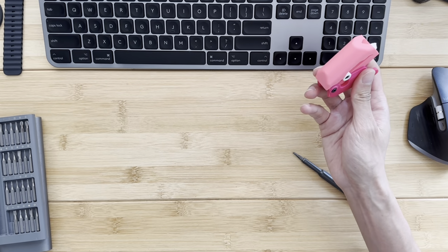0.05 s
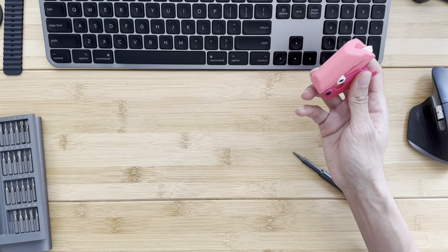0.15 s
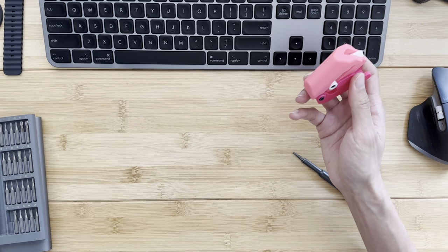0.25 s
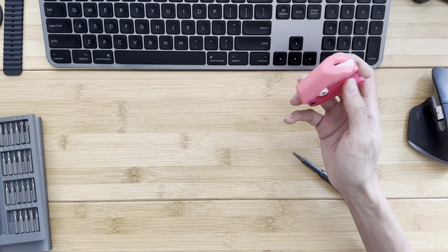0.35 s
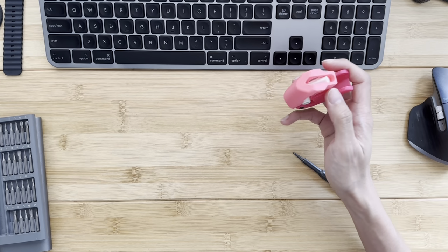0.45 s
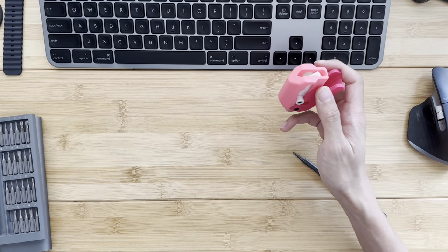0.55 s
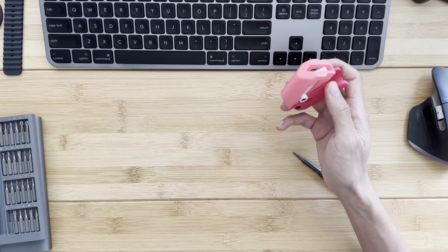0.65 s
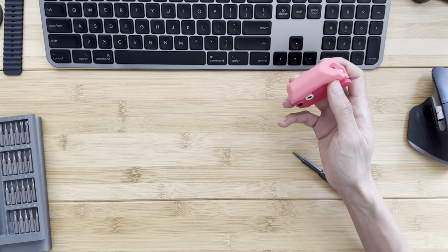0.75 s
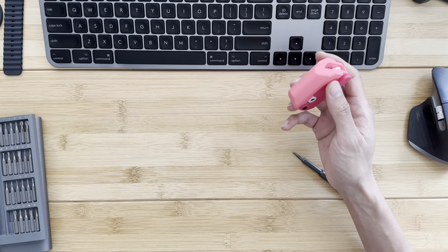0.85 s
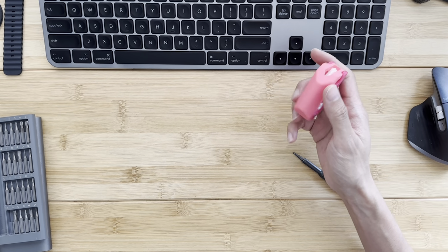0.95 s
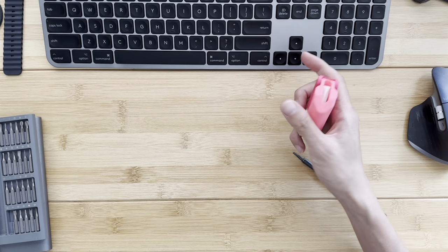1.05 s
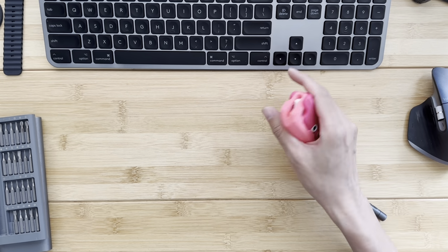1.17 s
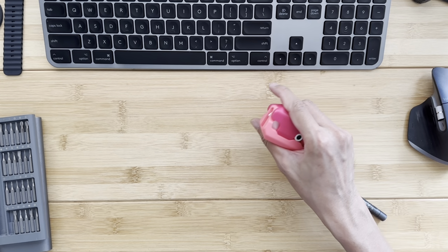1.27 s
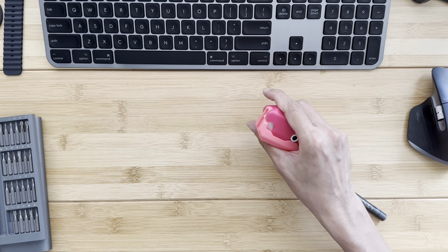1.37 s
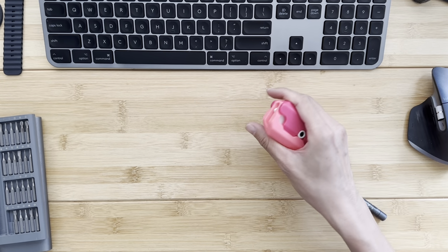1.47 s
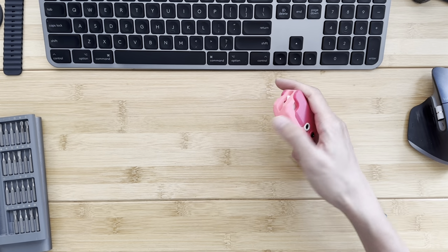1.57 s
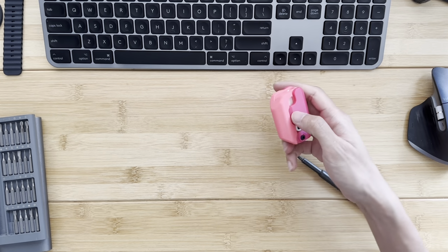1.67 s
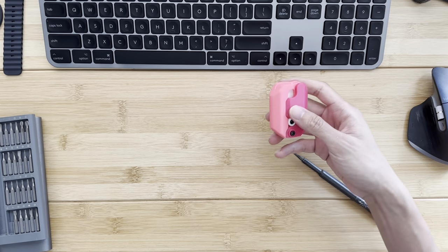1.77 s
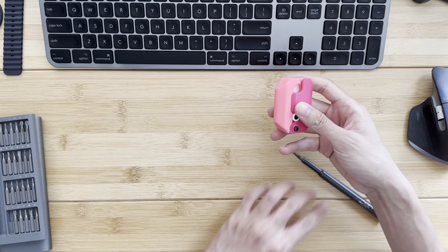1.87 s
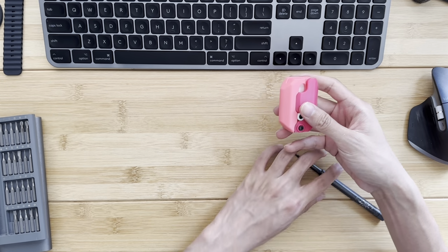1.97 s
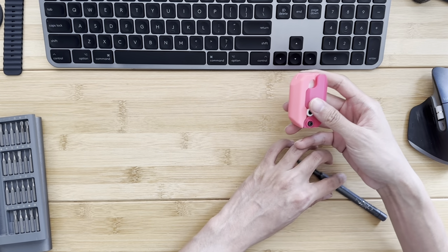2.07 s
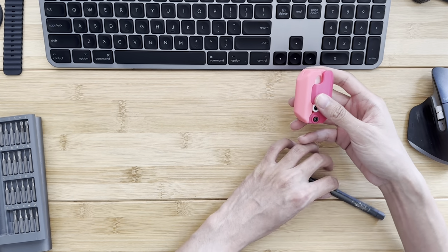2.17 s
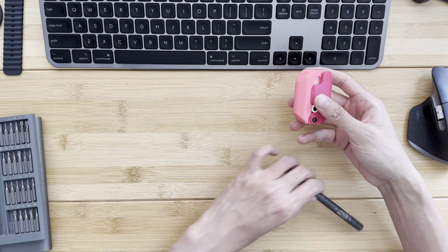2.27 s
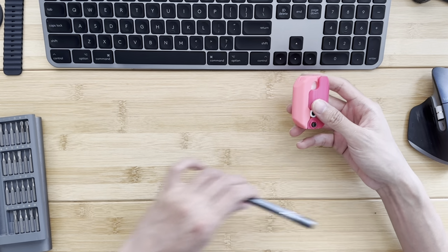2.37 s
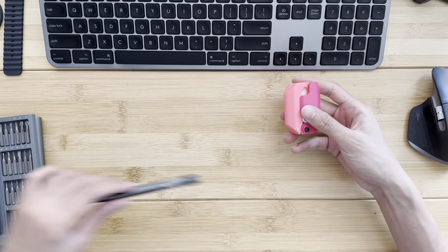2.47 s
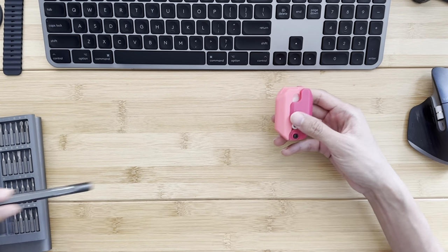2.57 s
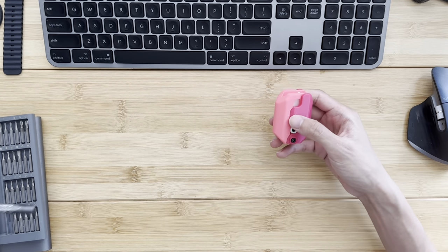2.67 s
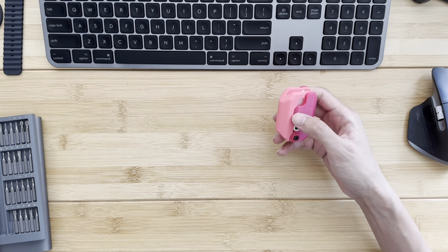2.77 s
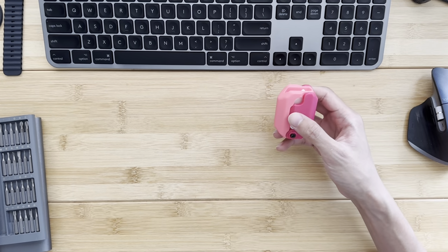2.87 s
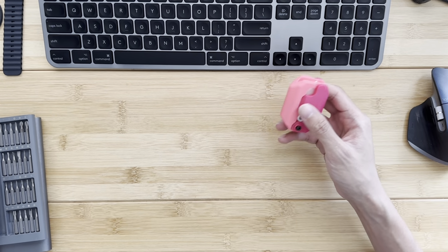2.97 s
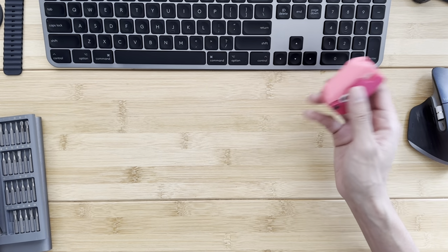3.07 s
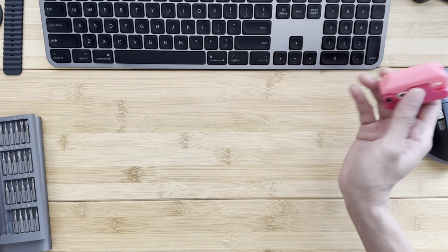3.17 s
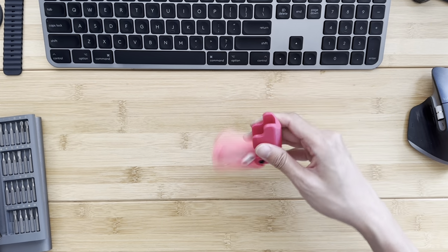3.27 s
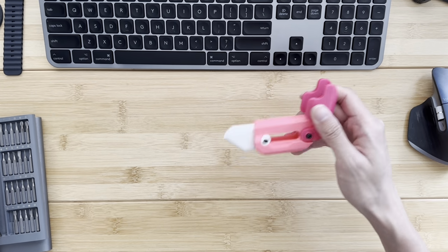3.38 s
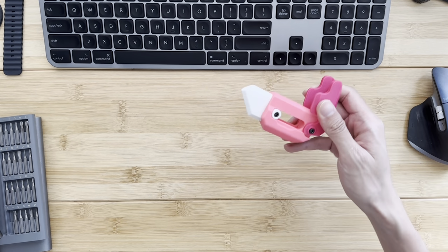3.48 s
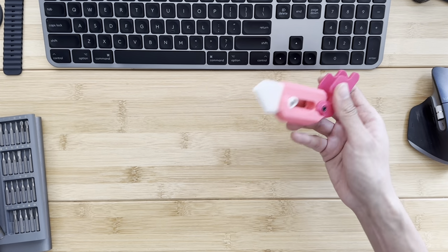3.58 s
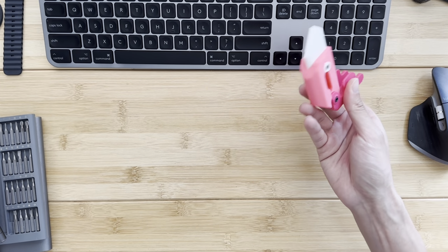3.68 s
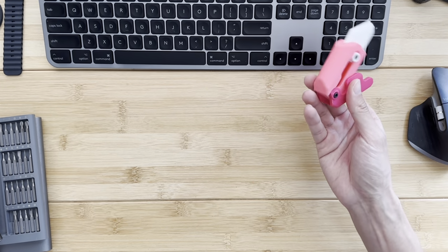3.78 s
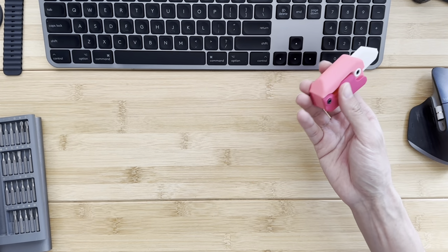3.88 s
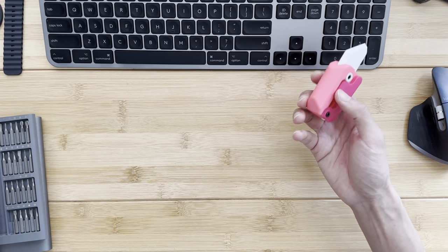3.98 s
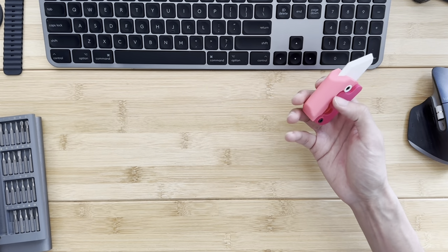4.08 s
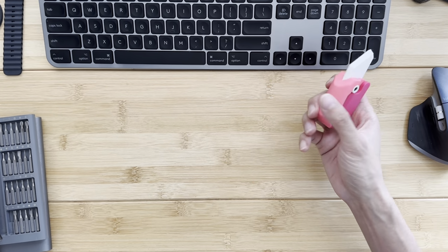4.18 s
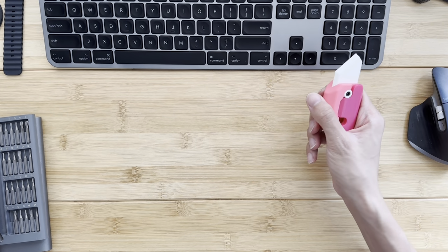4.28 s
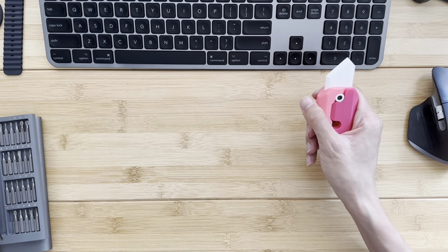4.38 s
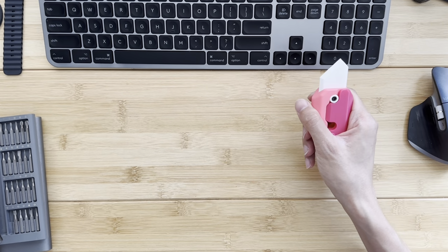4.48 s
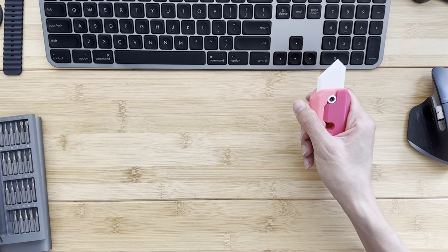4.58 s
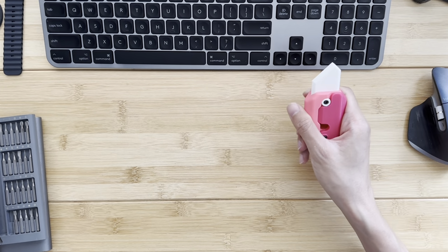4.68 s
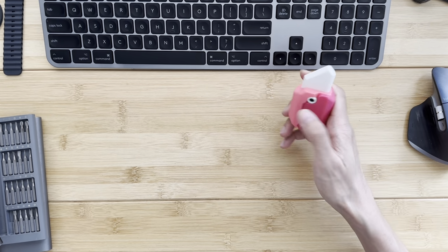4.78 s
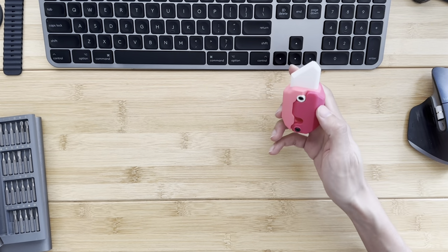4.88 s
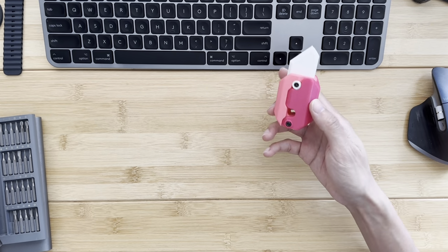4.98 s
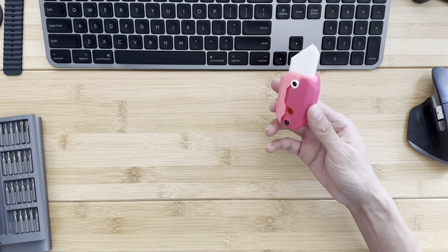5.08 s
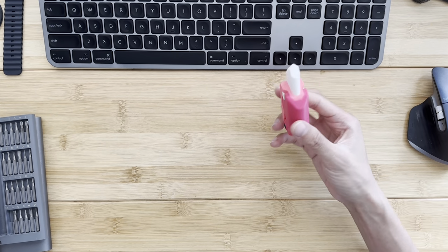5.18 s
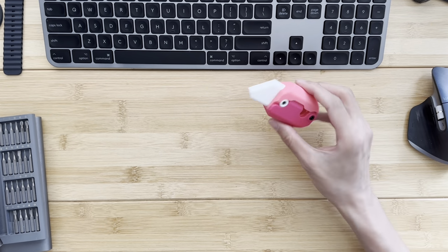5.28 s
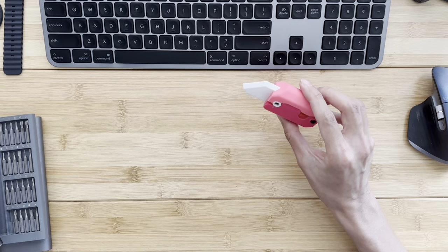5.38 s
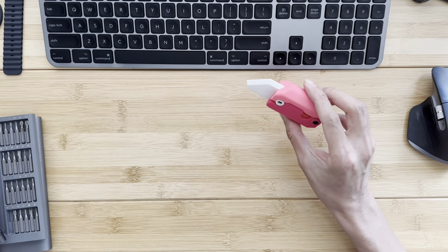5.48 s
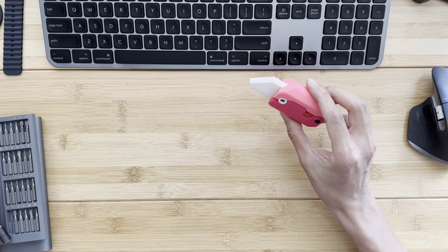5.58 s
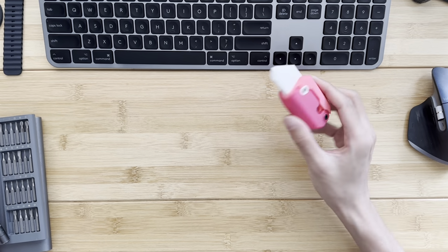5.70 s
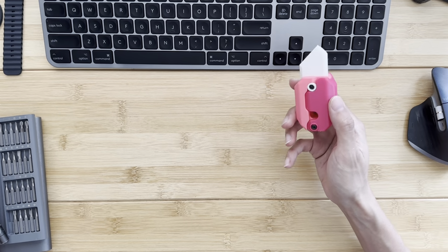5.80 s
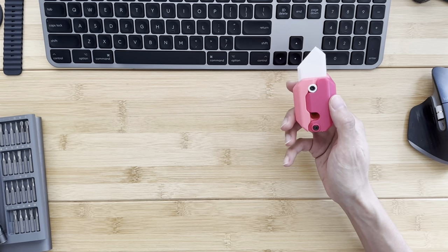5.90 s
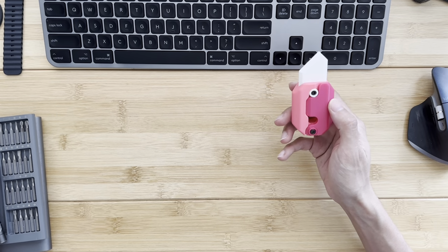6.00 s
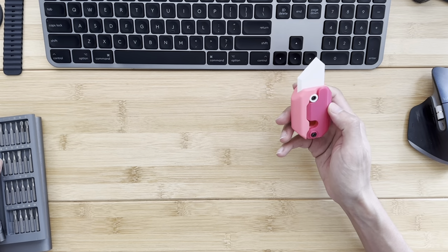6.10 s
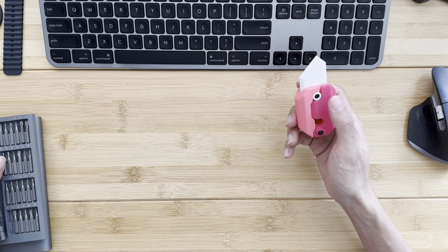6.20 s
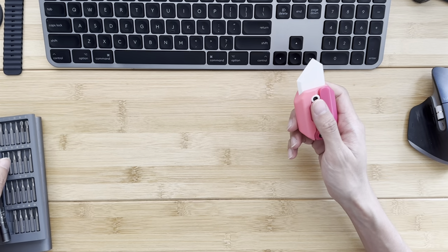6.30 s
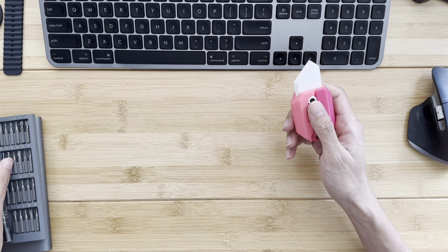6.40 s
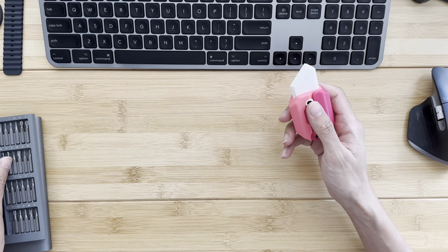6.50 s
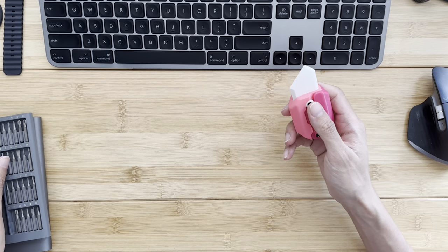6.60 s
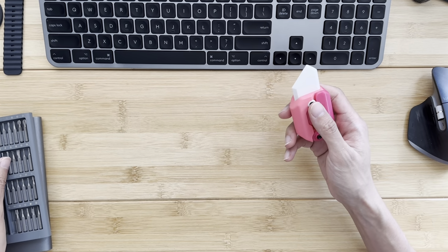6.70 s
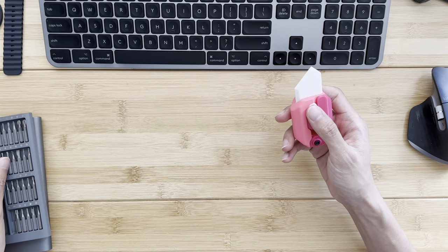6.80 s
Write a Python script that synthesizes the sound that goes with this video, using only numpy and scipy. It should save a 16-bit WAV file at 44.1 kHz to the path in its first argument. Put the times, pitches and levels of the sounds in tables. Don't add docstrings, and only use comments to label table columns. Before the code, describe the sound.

In a quiet room, light plastic clicks, a pen dragged off wood, a bouncy loud flick, a hard hollow snap, then soft desk knocks.

```python
import sys
import numpy as np
from scipy import signal
from scipy.fft import rfft, irfft, next_fast_len
from scipy.io import wavfile

SR = 44100
rng = np.random.default_rng(int(sys.argv[2]) if len(sys.argv) > 2 else 0)


def invert_db(x):
    u = np.asarray(x, float) / 20
    return 10 ** u


def to_wav(s):
    ch = np.atleast_2d(s).T
    pcm = np.round(np.clip(ch, -1, 1) * 32767)
    wavfile.write(sys.argv[1], SR, pcm.astype(np.int16))


N = 302085
LEAD_S = 0.01


def rms_one(x):
    return x / np.sqrt(np.mean(x ** 2) + 1e-20)


def peak_one(x):
    return x / (np.max(np.abs(x)) + 1e-20)


def in_time(rows):
    s, *columns = np.transpose(rows)
    return [np.interp(np.arange(N) / SR, s, c) for c in columns]


def at_hz(points, hz):
    table_hz, value = np.transpose(points)
    return np.interp(np.log(np.maximum(hz, 1)), np.log(table_hz), value)


def coloured(x, response):
    length = x.shape[-1]
    size = next_fast_len(length)
    spectrum = rfft(x, size) * response(np.fft.rfftfreq(size, 1 / SR))
    return irfft(spectrum, size)[..., :length]


def band(x, low_hz, high_hz):
    return signal.sosfilt(signal.butter(2, [low_hz, high_hz], "band", fs=SR, output="sos"), x)


def ring(x, hz, t60):
    r, w = invert_db(-60 / (t60 * SR)), 2 * np.pi * hz / SR
    return signal.lfilter([0, np.sin(w)], [1, -2 * r * np.cos(w), r * r], x + 1e-18)


def contacts(rows, onset, length=6000):
    t = np.arange(length) / SR - LEAD_S
    grit = rng.standard_normal((len(rows), 3, length))
    for row, noise in zip(rows, grit):
        contact_ms = np.clip(row[5], 0.3, 12)
        phase = t / (contact_ms * 0.00058) - 1 / onset
        swell = np.exp(-np.abs(phase * np.where(phase < 0, onset, 1)) ** 1.1)
        yield row, noise, swell, t


def add(out, s, sound):
    at = round((s - LEAD_S) * SR)
    out[at:at + len(sound)] += sound[:N - at]


def strokes(rows):
    t, gains = np.arange(0, N + 64, 64) / SR, 0
    for s, rise, fall, db, other_db in rows:
        far = np.where(t < s, (s - t) / max(rise, 0.004), (t - s) / max(fall, 0.004))
        fade_db = 30 * far * (1.5 + far ** 2 / 4)
        gains = gains + invert_db(db - fade_db + np.array([[0], [other_db]]))
    return [np.interp(np.arange(N) / SR, t, gain) for gain in gains]


def slips(per_s, spread_db):
    size = invert_db(spread_db * np.minimum(rng.exponential(1, (3, N)), 4))
    sign = rng.choice([-1, 1], (3, N))
    return size * sign * (rng.random((3, N)) < per_s / SR)


# pitch_hz, level_db (per Hz)
RUMBLE_COMMON = [(35, -8), (43, -2), (49, 8), (57, -3), (72, -11), (110, -2.5), (250, -15), (400, -21.5),
                 (560, -30), (800, -33), (1500, -42.5), (1850, -38.5), (2220, -33), (2800, -44.5),
                 (5000, -51), (8500, -53.5), (11000, -66.5)]
# pitch_hz, level_db (per Hz)
RUMBLE_DIFFERENCE = [(15, -47.5), (25, -11), (97, -7.5), (149, -1.5), (344, -2), (659, -7), (840, -3),
                     (1480, -26), (3250, -26), (4740, -29.5), (5430, -31), (14800, -35), (16000, -43.5)]


def rumble():
    noise = rng.standard_normal((2, N))
    common = rms_one(coloured(noise[0], lambda hz: invert_db(at_hz(RUMBLE_COMMON, hz)) * (hz > 20)))
    differing = rms_one(coloured(noise[1], lambda hz: invert_db(at_hz(RUMBLE_DIFFERENCE, hz)) * (hz > 20)))
    return invert_db(-55.5) * common + invert_db(-70) * differing * [[1], [-1]]


# pitch_hz, t60_s
ROOM_DECAY = [(200, 0.38), (1000, 0.064), (2200, .26), (4000, 0.3), (8000, 0.2), (16000, 0.12)]
# pitch_hz, common_share (0..1)
ROOM_COMMON = [(500, 0.36), (2000, 0.98), (5000, 0.88), (9000, .9), (15000, 0.76)]


def room(x, length=22000):
    t, tail = np.arange(length) / SR, 0
    edges = 150 * 2 ** np.arange(0, 7.1, 1)
    shared, own = rng.standard_normal((2, length)), rng.standard_normal((2, 2, length))
    for k, (low, high) in enumerate(zip(edges, edges[1:])):
        centre_hz = np.sqrt(low * high)
        alike = np.clip(at_hz(ROOM_COMMON, centre_hz), 0, 1)
        noise = np.sqrt(alike) * shared[k % 2] + np.sqrt(1 - alike) * own[k % 2]
        tail = tail + band(noise, low, high) * invert_db(-60 * t / at_hz(ROOM_DECAY, centre_hz))
    tail *= 1 - np.exp(-(t / 0.001) ** 2)
    tail *= invert_db(-11) / np.sqrt(np.sum(tail ** 2) / 2)
    ceiling_s, ceiling_db = 0.015, -19
    for late_s, share in ((-0.0011, 0.9), (0, 0.5), (0.0017, -0.6)):
        tail[:, round((ceiling_s + late_s) * SR)] += share * invert_db(ceiling_db)
    return signal.fftconvolve(x[None], tail, axes=1)[:, :N]


# pitch_hz, phase_rad
PORT_LEAD = [(1000, 0), (3000, -.5), (6000, -1), (8000, -1.8), (10600, -2.2), (11800, -3), (13500, -3.2),
             (15500, -4.4)]
# pitch_hz, level_db
MIC_RESPONSE = [(600, -5), (1200, 1), (9000, 0), (15500, -0.5)]


def ports(x):
    return coloured(x, lambda hz: invert_db(at_hz(MIC_RESPONSE, hz)) * np.exp(0.5j * at_hz(PORT_LEAD, hz) * [[1], [-1]]))


# start_s, peak_db, pitch_hz
HAND_THUDS = [
    (2.181, -36.5, 108),
    (2.301, -36, 106),
    (5.691, -39, 103.7),
    (6.369, -43.5, 144.3),
    (6.585, -27, 140.8),
    (6.619, -35, 156),
]


def thuds(length=8000):
    out, t = np.zeros(N), np.arange(length) / SR
    push = t * np.exp(-t / 0.0012)
    for s, db, hz in HAND_THUDS:
        add(out, s + LEAD_S, invert_db(db) * peak_one(ring(push, hz, 0.19)))
    return out


# pitch_hz, level_db, t60_s
DESK_MODES = [(259, -3, 0.022), (335.7, 12, 0.027), (387.4, 5.5, 0.12), (393, 3, 0.091),
              (478.2, 11.5, 0.13), (604, -45, 0.082)]


def desk_top(pushes):
    return sum(invert_db(db) * ring(pushes[k % 3], hz, t60) for k, (hz, db, t60) in enumerate(DESK_MODES))


# pitch_hz, level_db, t60_s
PEN_MODES = [(1500, -0.5, 0.026), (2200, -1.5, 0.022), (2600, -5, 0.017), (3300, -1, 0.014),
             (4200, -3.5, .016), (5220, -7.5, .012)]


def barrel(pushes, grip=1.0):
    out = 0
    for k, (hz, db, t60) in enumerate(PEN_MODES):
        tilt_db = 20 * np.log10(hz / 2500) * (grip - 1) / 3
        out = out + invert_db(db + tilt_db) * ring(pushes[k % 3], hz, t60 / grip)
    return out


# peak_s, rise_s, fall_s, desk_db, drag_db (above desk)
DESK_SLIDES = [(2.107, 0.0064, 0.4, -42, -20), (2.18, 0.14, 0.092, -37, -20.5),
               (2.276, 0.089, 0.13, -41.5, -1), (5.43, 0.016, .5, -75.5, 4), (5.5, 0.062, .2, -81, -7),
               (5.99, .1, .1, -61, -16), (6.42, .06, .06, -51, -14), (5.6, 0.21, 0.084, -69, -3.5),
               (5.66, .01, 0.06, -48.5, 8), (5.7, .04, 0.22, -60, 4), (6.068, 0.32, 0.097, -60, -4.5),
               (6.138, 0.088, 0.11, -54, -10), (6.286, 0.074, 0.13, -54.5, -9.5),
               (6.362, 0.0056, .14, -46.5, -0.5), (6.53, 0.24, 0.13, -57, 1), (6.6, 0.014, 0.16, -34, -16),
               (6.675, 0.0097, 0.21, -53, -8.5), (6.85, .2, .1, -50.5, -2.5)]
# peak_s, rise_s, fall_s, low_mode_db, high_mode_db (above low)
PEN_HUMS = [
    (5.43, .02, .15, -72, -2),
    (5.49, .08, .35, -66, -10),
    (5.72, .05, .25, -64, -6),
    (6.04, .04, .2, -68, 0),
    (6.09, .08, .12, -68, -2),
]


def sliding():
    weight, friction = strokes(DESK_SLIDES)
    grains = slips(3000, spread_db=4.5)
    desk = rms_one(desk_top(grains)) + 0.5 * rms_one(band(grains[2], 293, 870))
    drag = rms_one(band(band(grains[0], 640, 2830), 600, 3000))
    drag = rms_one(drag + 0.75 * rms_one(barrel(grains)))
    rustle = rms_one(band(grains[1], 2800, 5500))
    low, high = strokes(PEN_HUMS)
    hum_t60_s = 0.035
    hum = low * rms_one(ring(grains[1], 1510, hum_t60_s)) + high * rms_one(ring(grains[2], 4180, hum_t60_s))
    return hum + invert_db(-3) * weight * desk + friction * (invert_db(-3.5) * drag + invert_db(-11) * rustle)


# pitch_hz, level_db (per Hz)
CRACK_COLOUR = [(2500, -7.5), (4000, 5), (5500, -1.5), (7000, 0), (9000, 1.5), (10500, -0.5), (12500, -1),
                (15000, -1)]
# pitch_hz, width_hz, level_db
SHELL_MODES = [(2650, 140, 5.5), (4870, 200, 0), (6167, 2300, 7.5), (7800, 1700, 4), (9300, 1800, -0.5)]


def bright(hz):
    modes_db = sum(db / (1 + (2 * (hz - f) / width) ** 2) for f, width, db in SHELL_MODES)
    return invert_db(at_hz(CRACK_COLOUR, hz) + modes_db)


def crack(burst, click=0.14):
    loudest = np.abs(burst) == np.abs(burst).max()
    burst = burst + click * np.linalg.norm(burst) * loudest
    return peak_one(coloured(band(burst, 2200, 15000), bright))


# start_s, peak_db, tap_hz, crack_db, desk_db
DESK_KNOCKS = [(2.109, -62, 1000, -30, 9), (2.151, -41, 900, -42, 18), (2.1725, -30, 1250, -32, 6),
               (2.193, -56, 1260, -23, 17), (2.234, -39, 890, -25, 5.5), (2.257, -40.5, 2600, -27, -19),
               (2.277, -40.5, 1270, -36, 9.5), (5.652, -26, 6060, 0, -16), (6.277, -54.5, 1212, 0, -10),
               (6.361, -39, 870, -1, 3), (6.415, -51.5, 1462, -21.5, 9), (6.47, -52, 1620, -14, 8.5),
               (6.579, -21, 900, 1, -12), (6.585, -30.5, 5520, 9, 1.5), (6.671, -42, 1020, -20, -6),
               (6.720, -43.5, 933, -35, -21), (6.811, -52, 4000, -14, -10), (5.653, -28, 3150, -32, -17),
               (5.654, -32, 2400, -31, -4), (6.580, -30, 4396, -13, -27), (6.586, -30, 5600, -4, -20),
               (6.361, -39.5, 4450, -20, -22), (2.127, -50, 600, -40, 8), (2.258, -44, 5000, -10, -20),
               (2.290, -46, 990, -13, 0), (6.469, -49, 3900, -16, -20), (6.498, -54, 1529, -25, -10),
               (6.835, -56, 886, -25, -2), (2.184, -44.5, 600, -30, 14), (2.140, -55, 4200, -20, 0)]


def knocks():
    out = np.zeros(N)
    blows = [(*row, 3.2 + 0.08 * (row[1] + 20)) for row in DESK_KNOCKS]
    for (s, db, hz, crack_db, desk_db, ms), noise, swell, t in contacts(blows, onset=3.1):
        burst = swell * noise
        low_hz, high_hz = 0.48 * hz, 2.5 * hz
        dull = band(band(burst[1], low_hz, high_hz), low_hz, high_hz)
        tap = peak_one(ring(burst[0], hz, 0.012 + 7.3 / hz) + 2.0 * dull)
        push = swell ** 8 * (1 + 0.3 * noise)
        desk = peak_one(desk_top(np.roll(push, round(0.003 * SR), axis=1)))
        snap = crack(burst[2]) + invert_db(-7) * peak_one(barrel(burst, grip=2.8))
        add(out, s, invert_db(db) * (tap + invert_db(crack_db) * snap + invert_db(desk_db) * desk))
    return signal.sosfilt(signal.butter(1, 10500, fs=SR, output="sos"), out)


# start_s, length_s, hiss_db, drag_db (above hiss), loudest_patch_hz
FINGER_BRUSHES = [(0.251, 0.019, -76, 8, 4960), (0.412, 0.055, -70, -7, 5900),
                  (0.691, 0.13, -70.5, 20.5, 5000), (0.892, 0.17, -78, 10, 8000),
                  (1.001, 0.073, -72, -12, 6300), (1.512, .06, -76.5, -10.5, 8900),
                  (1.681, 0.05, -68.5, -10.5, 8500), (1.691, 0.076, -74.5, 3, 4200),
                  (1.757, 0.11, -74.5, -2, 8500), (2.613, 0.037, -63, -5.5, 7520),
                  (2.798, 0.19, -80, 6.5, 4900), (3.08, 0.15, -75.5, 5.5, 5160),
                  (3.19, 0.084, -62.5, -10, 5400), (3.741, 0.09, -74, 4, 6200),
                  (3.996, 0.29, -80, 11, 4000), (4.735, 0.054, -70.5, -16.5, 6420),
                  (4.9, 0.033, -71, 6, 5000), (5.01, 0.053, -83, 6, 9500), (5.03, 0.11, -79.5, -5, 4500),
                  (5.791, 0.074, -72.5, 6, 9500), (5.96, .06, -81.5, 10, 9500),
                  (6.019, .15, -73.5, 8, 8200)]


def brushes(grit, hiss):
    out = np.zeros((3, N))
    peak = 0.35
    for s, long_s, db, drag_db, hz in FINGER_BRUSHES:
        at = np.arange(round((s - long_s) * SR), round((s + 2 * long_s) * SR))
        far = (at / SR - s) / long_s
        off_peak = np.where(far < peak, (peak - far) / peak, (far - peak) / (1 - peak))
        gain = invert_db(db - 23 * off_peak ** 2)
        patch = rms_one(ring(grit[at], hz, 0.0064))
        out[0, at] += gain * (hiss[at] + 0.76 * patch)
        out[1, at] += gain
        out[2, at] += gain * invert_db(drag_db)
    return out


# peak_s, rise_s, fall_s, hollow_db,
# hiss_db (above hollow)
SLIDER_RUNS = [(0.005, 0.072, 0.16, -48.5, -14.5), (0.463, 0.037, 0.017, -31, -16),
               (0.77, .12, 0.068, -38, -23), (1.145, 0.024, 0.013, -39, -14),
               (3.317, 0.044, 0.043, -37, -16.5), (3.347, 0.045, 0.013, -20.5, 4),
               (3.42, .02, 0.68, -48.5, -8.5), (3.616, 0.042, 0.043, -40.5, -20.5),
               (3.7, 0.009, 0.073, -48, -34), (3.858, 0.11, 0.23, -30.5, -14),
               (3.894, 0.0055, 0.018, -27, -6), (3.93, .03, 0.2, -78, -14), (3.37, .015, .12, -43, 7),
               (4.33, .006, .12, -59, 17.5)]
# peak_s, rise_s, fall_s, dull_db, bright_db (above dull)
SLIDER_SCRAPES = [
    (3.848, 0.046, .1, -43.5, -4),
    (3.87, .08, .04, -52, 10),
    (3.9, .02, .14, -56, 12),
    (0.76, .1, .06, -55, -6),
]
# time_s, pitch_hz
HOLLOW_PITCH = [(0, 3273), (1.0, 3350), (1.3, 4054), (3.2, 3595), (3.4, 3720), (3.6, 3455), (3.9, 3735),
                (4.3, 3399), (6.85, 3367)]


def rubbing():
    slot, slot_hiss = strokes(SLIDER_RUNS)
    grains = slips(4000, spread_db=3.0)
    slow = signal.lfilter([1], [1, -0.975], grains[1] + 1j * grains[0])
    turn = np.exp(2j * np.pi * np.cumsum(in_time(HOLLOW_PITCH)[0]) / SR)
    hollow = rms_one((slow * turn).real)
    hiss = rms_one(coloured(band(grains[2], 3900, 18000), bright))
    brush, skin, skin_drag = brushes(grains[1], hiss)
    drag = rms_one(band(grains[0], 980, 2900))
    dull, sharp = strokes(SLIDER_SCRAPES)
    scrape = dull * rms_one(ring(grains[2], 1890, 0.003)) + sharp * rms_one(ring(grains[0], 6370, 0.0015))
    out = band(scrape, 1130, 9000)
    out = out + invert_db(-5.5) * (skin_drag + invert_db(-9.5) * slot) * drag
    out = out + invert_db(-6) * (slot + invert_db(-2.5) * skin) * hollow
    return out + invert_db(-0.5) * (brush + slot_hiss * hiss)


# start_s, peak_db, hollow_hz, crack_db, contact_ms
LATCHES = [(3.313, -29, 2880, 7, 2.2), (3.320, -24, 3450, -6, 3), (3.327, -21, 3450, -2, 4.2),
           (3.338, -21, 3510, 0, 2.3), (3.3445, -13.5, 3556, 8.5, 2.6), (3.8955, -20, 2900, 6, 1.7),
           (3.8965, -22, 2400, -10, 1.5), (3.8965, -19, 3820, -31, 2.4), (3.358, 0, 3600, -18, 1.1),
           (3.361, -20, 3600, -5.5, 2.5), (3.348, -19, 3500, 8, 2), (3.369, -13.5, 3650, -24.5, 2),
           (3.3735, -12, 3760, -18.5, 3), (3.388, -17, 3800, -15, 2.5), (3.379, -19, 3700, -15, 3.5),
           (3.398, -23, 3750, -15, 3.5), (3.408, -24, 3600, -15, 3), (4.336, -22, 2196, -3, 3.5),
           (4.319, -20, 2200, -6, 1.5), (4.296, -31.5, 2265, 0.5, 1.99), (4.309, -31, 2390, -7, 2.9),
           (4.322, -3.5, 2177, -3, 2.95), (4.3233, -11.5, 1611, -3.5, 1.5), (4.324, -17, 3394, -3.5, 1.5)]
# start_s, peak_db, hollow_hz, crack_db, wall_db
LIGHT_SNAPS = [(0.257, -57, 3400, -6, -0.5), (0.405, -49, 3170, -31, -5), (0.437, -37.5, 3250, -4, -3.5),
               (0.4668, -19.5, 3320, -3, -12), (0.671, -56, 3060, -36, 3.5), (0.721, -46.5, 3200, -27, 3),
               (0.735, -49, 3420, -18, 5), (0.7785, -38, 3400, 5.5, 4), (0.922, -54, 3440, -18.5, 0),
               (0.975, -46.5, 3420, -24, 0.5), (1.149, -30, 4770, 7, -10), (2.623, -52, 2960, -17.5, -33),
               (3.436, -31, 3780, -8, -17), (3.505, -37.5, 3450, 2, -29.5), (3.606, -37.5, 3500, -0.5, -13),
               (3.615, -41, 3700, 8, -20), (3.676, -56, 3400, -23, 8), (3.701, -54.5, 3400, 7, 3),
               (3.79, -37.5, 3430, -19.5, -24.5), (3.84, -38, 3630, -1, -3), (4.871, -58, 2500, -5, -19),
               (4.908, -45, 2293, -7.5, -4), (5.034, -53, 2140, -28, -22), (5.422, -61, 1974, -21, 7.5)]
# start_s, peak_db, hollow_hz
SMALL_TICKS = [(0.362, -66, 3300), (3.24, -62, 1900), (3.624, -41.5, 3580), (3.772, -54, 3240),
               (5.487, -58, 1500), (6.031, -57.5, 2000), (0.445, -42, 3300), (0.4625, -32, 3350),
               (0.4665, -30.5, 5100), (0.700, -60, 1630), (0.712, -56, 3080), (0.762, -40.5, 3200),
               (0.856, -57, 1800), (1.149, -31, 4100), (1.1515, -35, 3500), (3.300, -48, 3300),
               (3.309, -36, 3230), (3.891, -39, 3400), (3.877, -33, 3800), (3.906, -33, 2700),
               (3.22, -62, 5400)]


def snaps():
    out = np.zeros((2, N))
    snap_ms = 2.4
    # start_s, peak_db, hollow_hz, crack_db, wall_db, contact_ms; a latch's wall thud lies under its crack
    blows = [(s, db, hz, crack_db, crack_db - 11.5, ms) for s, db, hz, crack_db, ms in LATCHES]
    blows += [(*row, snap_ms) for row in LIGHT_SNAPS]
    blows += [(*row, -1, -6, snap_ms) for row in SMALL_TICKS]
    for (s, db, hz, crack_db, wall_db, ms), noise, swell, t in contacts(blows, onset=1.2):
        push = swell * (np.cos(2 * np.pi * hz * t) + 0.9 * noise[0])
        air = ring(push, hz, 0.0037) + 0.17 * ring(push, 1.3 * hz, 0.004)
        add(out[0], s, invert_db(db) * peak_one(air))
        add(out[1], s, invert_db(db + crack_db) * crack(swell * noise[2]))
        add(out[1], s, invert_db(db + wall_db) * peak_one(band(swell * noise[1], 890, 2500)))
    return signal.sosfilt(signal.butter(4, 850, "high", fs=SR, output="sos"), out)


def scene():
    hollow, shell = snaps()
    desk = knocks() + sliding()
    shell = shell + rubbing()
    toy_pan, desk_pan = invert_db(np.array([[0.2], [-0.2]])), invert_db(np.array([[1.1], [-1.1]]))
    near = (hollow + shell) * toy_pan + desk * desk_pan + thuds()
    return ports(near + room(invert_db(-1) * hollow + shell + desk)) + rumble()


def roll_off(x):
    return signal.sosfilt(signal.butter(12, 17150, fs=SR, output="sos"), x)


def record(dry):
    x = signal.sosfilt(signal.butter(8, 42, "high", fs=SR, output="sos"), dry)
    x = 1.1 * np.tanh(x / 1.1)
    x = signal.sosfilt(signal.cheby2(12, 60, 16950, fs=SR, output="sos"), x)
    return roll_off(x)


dry = scene()
out = record(dry)
to_wav(out)
```